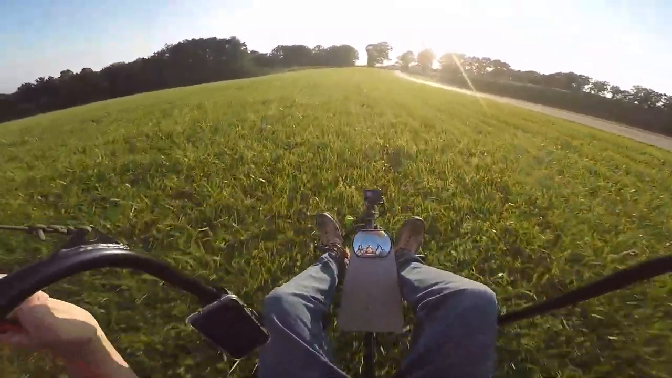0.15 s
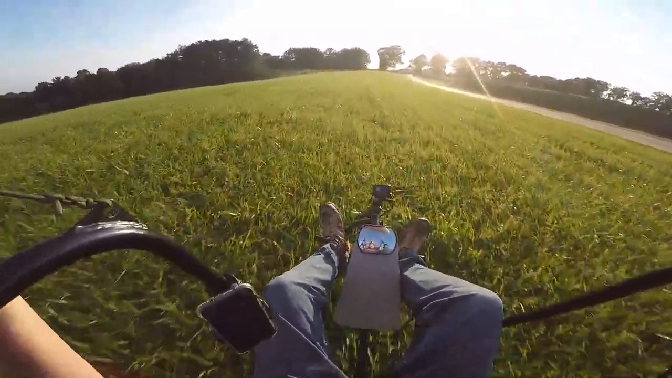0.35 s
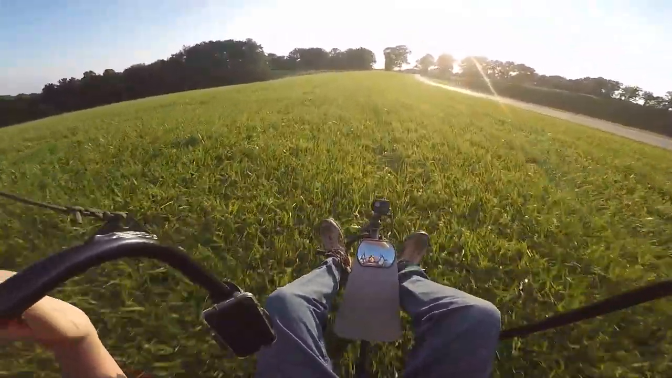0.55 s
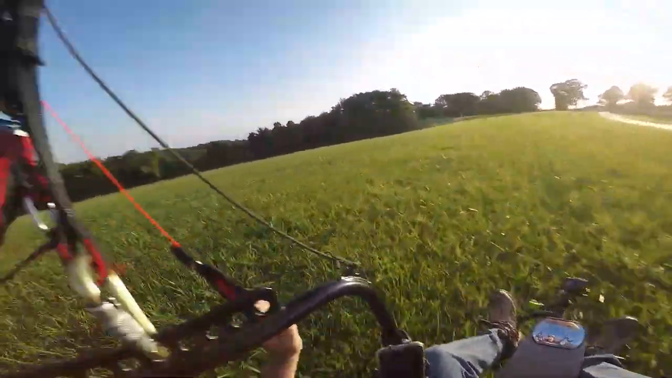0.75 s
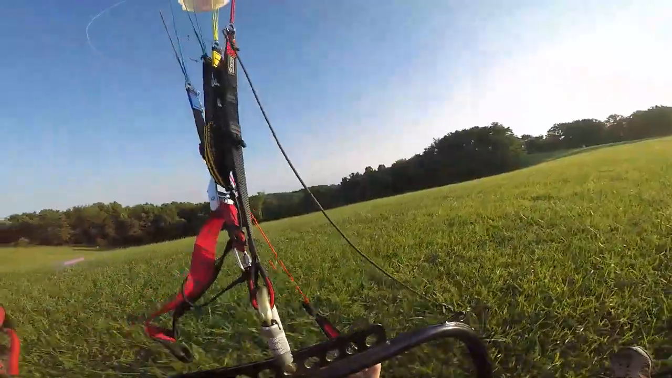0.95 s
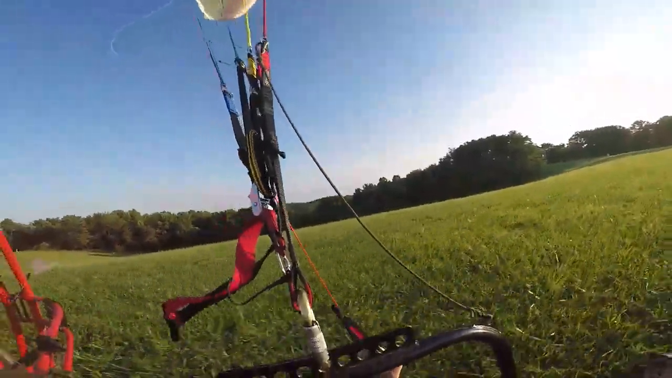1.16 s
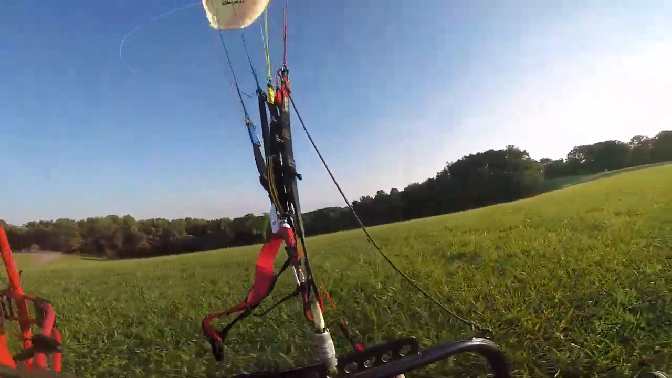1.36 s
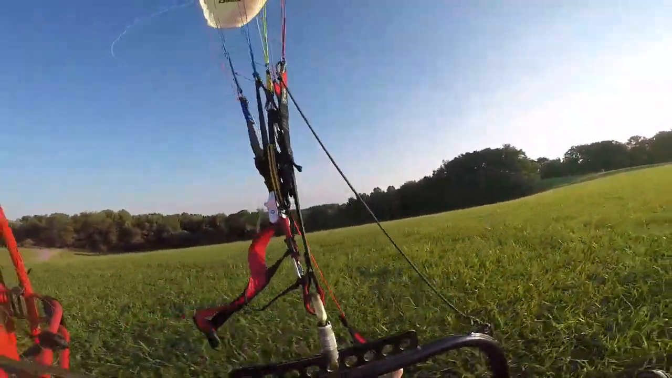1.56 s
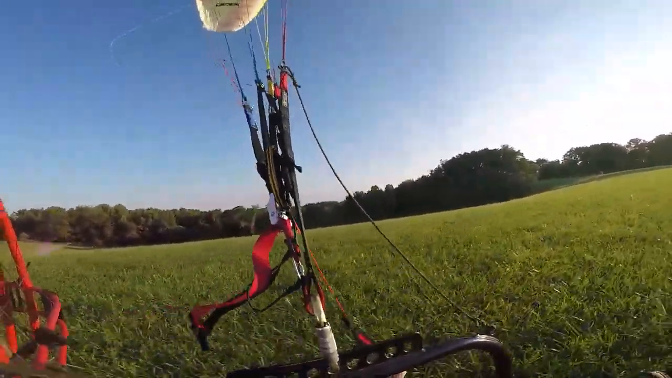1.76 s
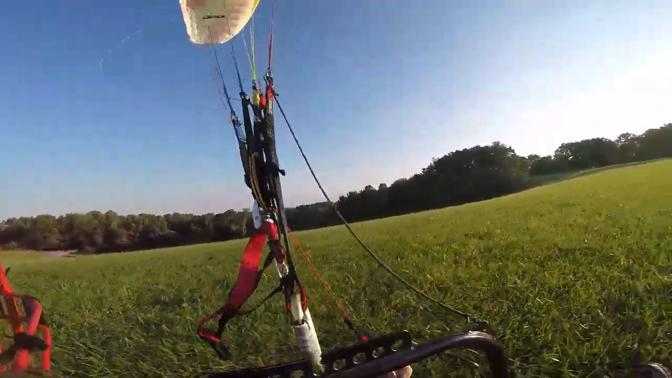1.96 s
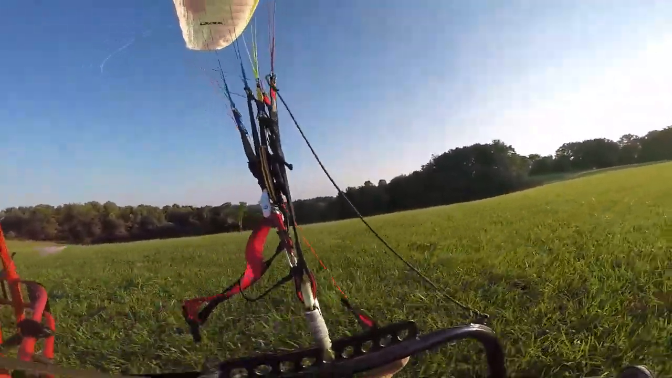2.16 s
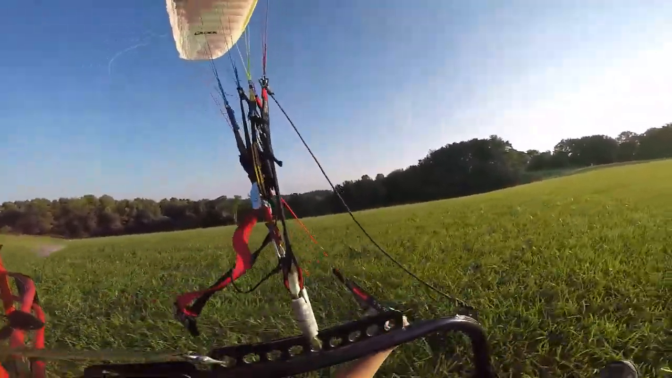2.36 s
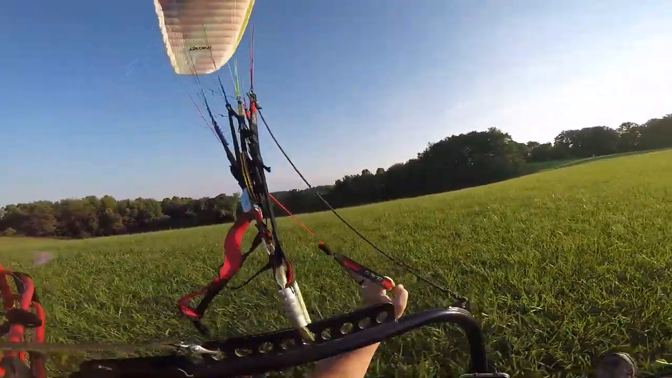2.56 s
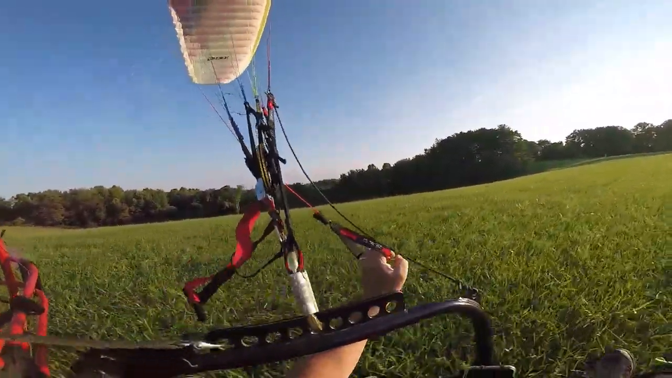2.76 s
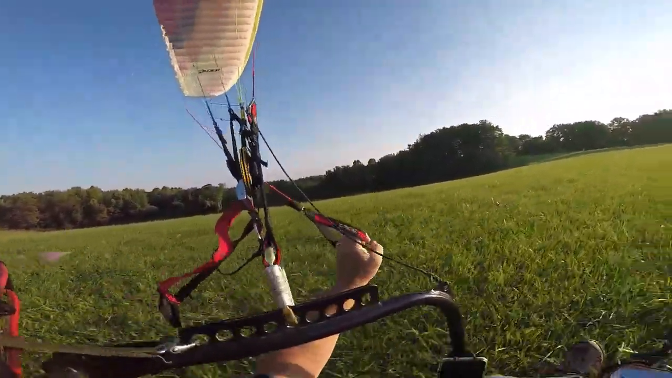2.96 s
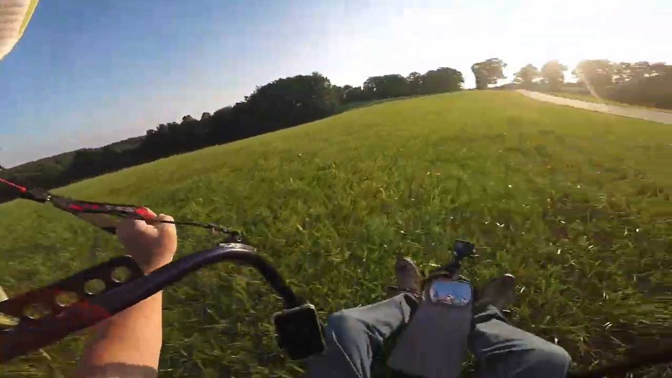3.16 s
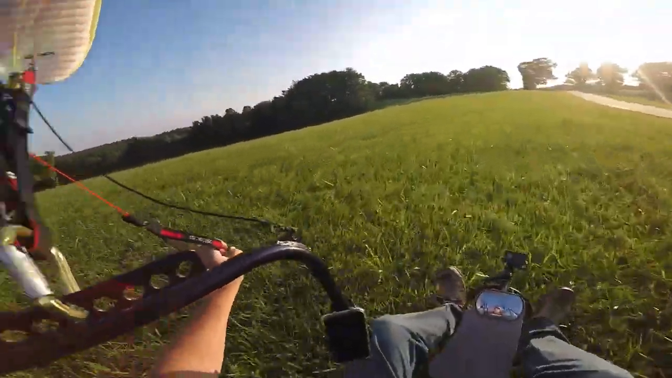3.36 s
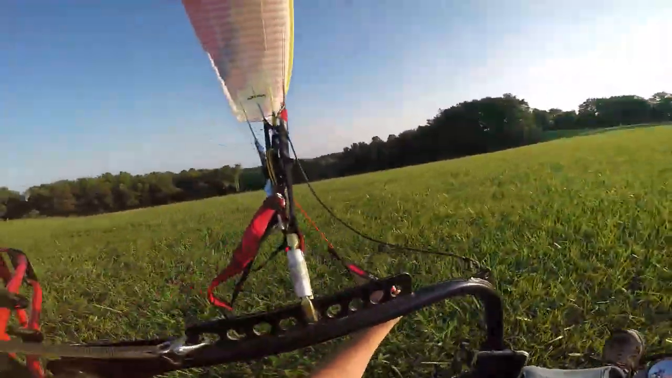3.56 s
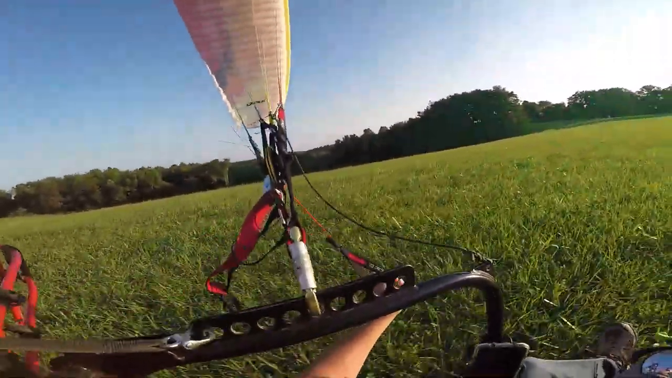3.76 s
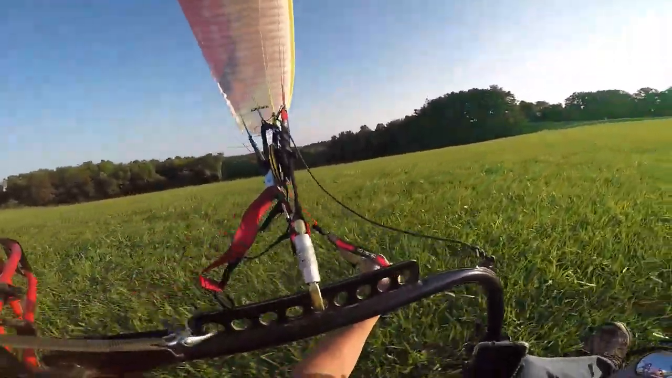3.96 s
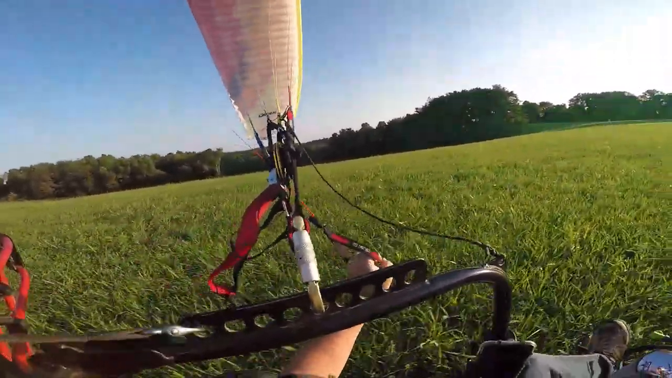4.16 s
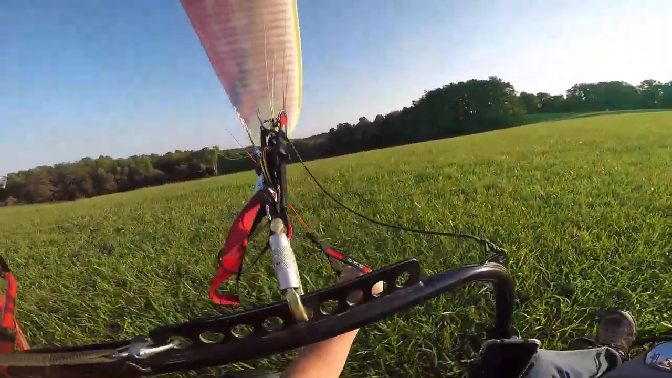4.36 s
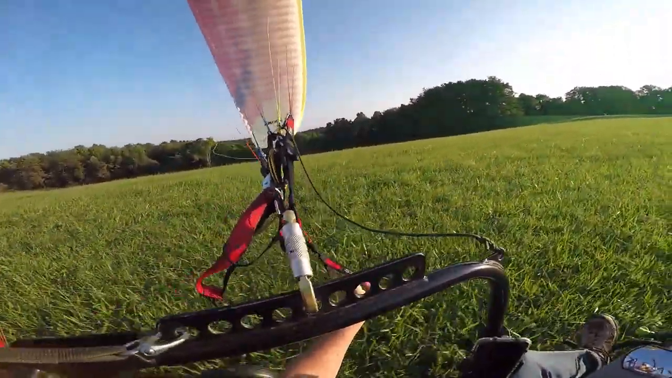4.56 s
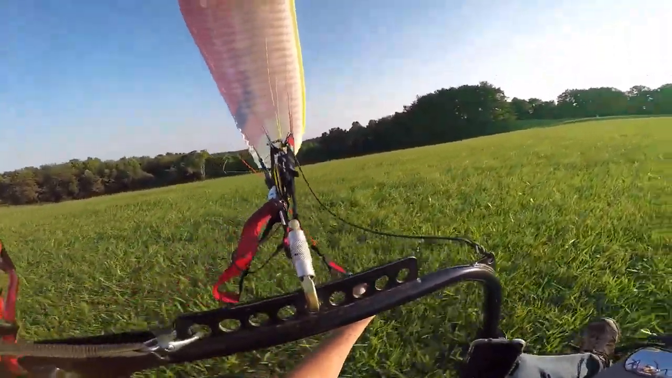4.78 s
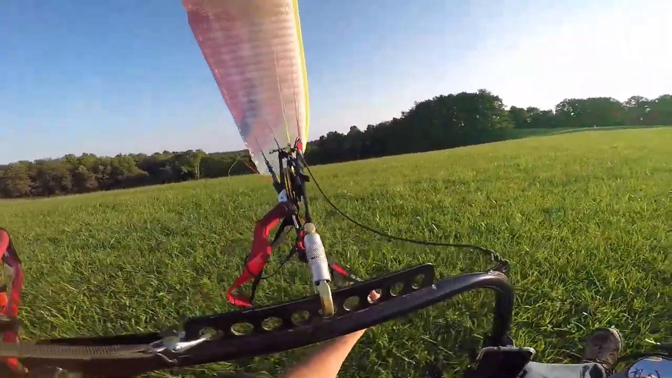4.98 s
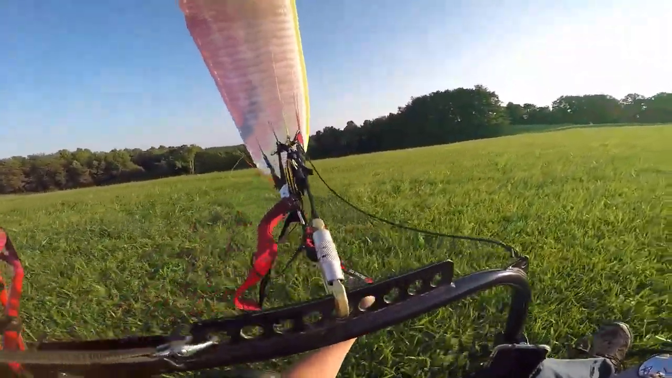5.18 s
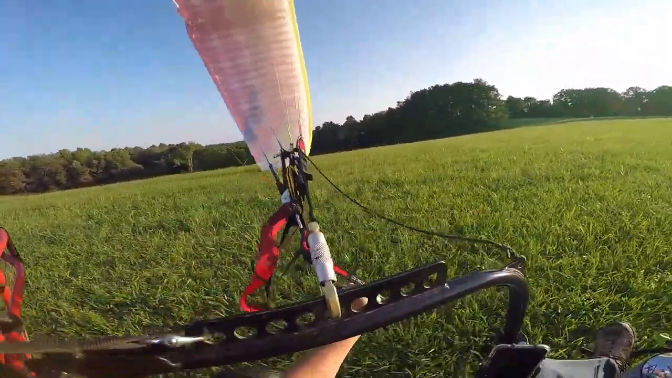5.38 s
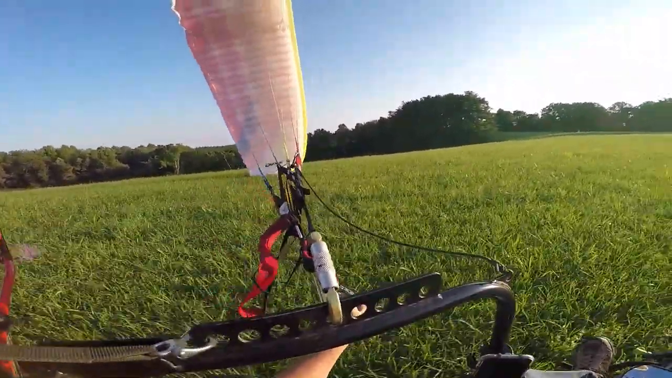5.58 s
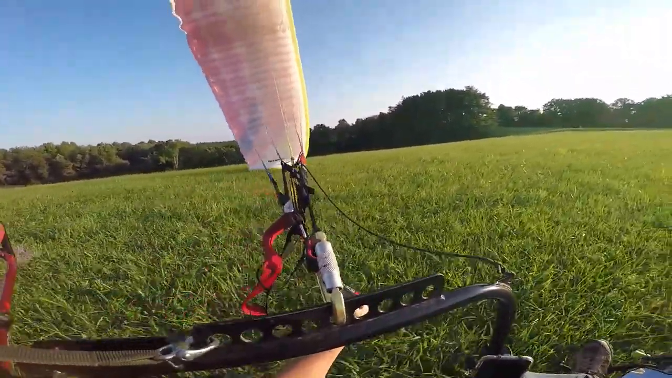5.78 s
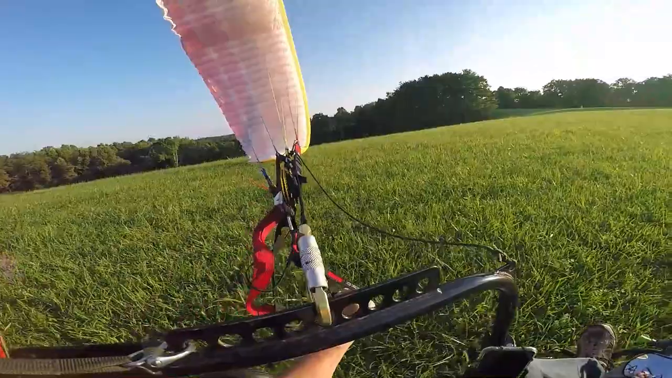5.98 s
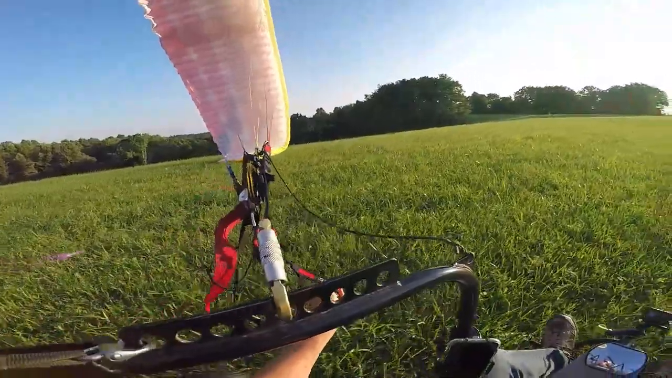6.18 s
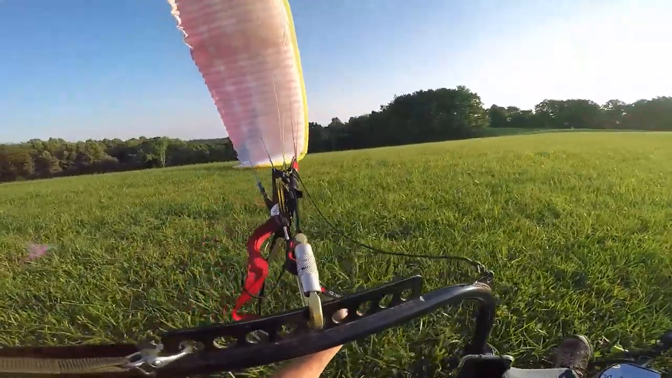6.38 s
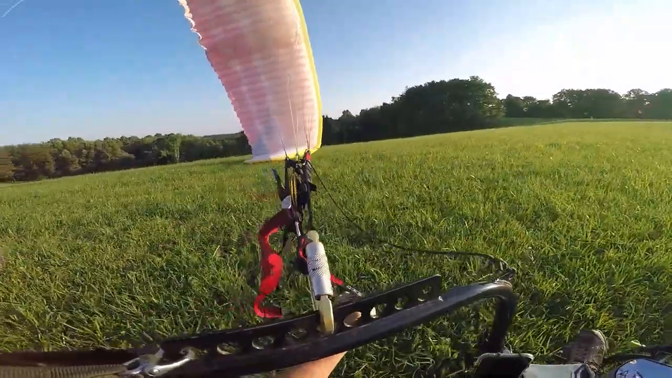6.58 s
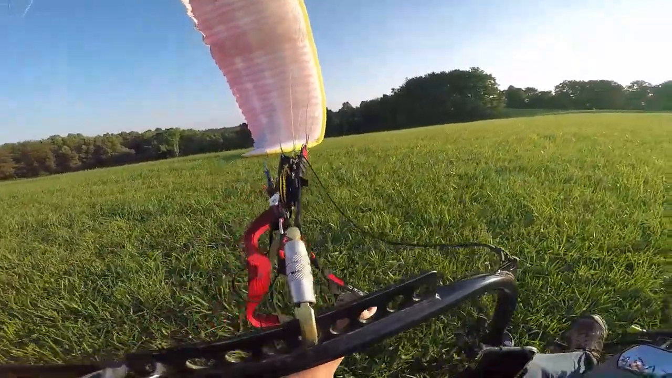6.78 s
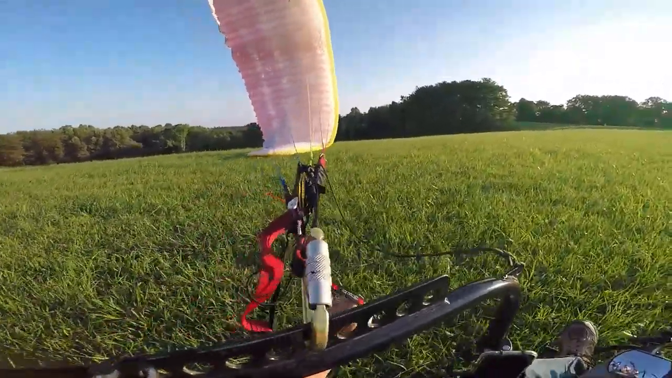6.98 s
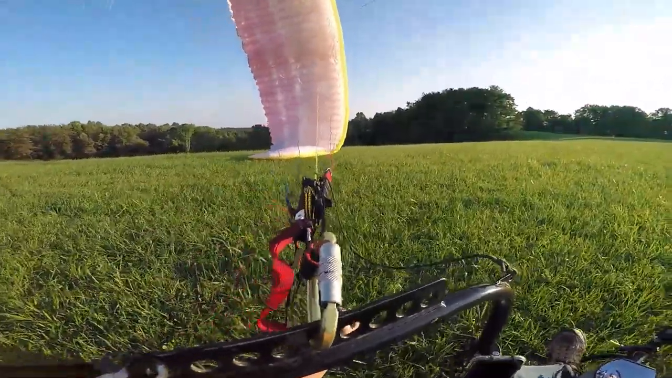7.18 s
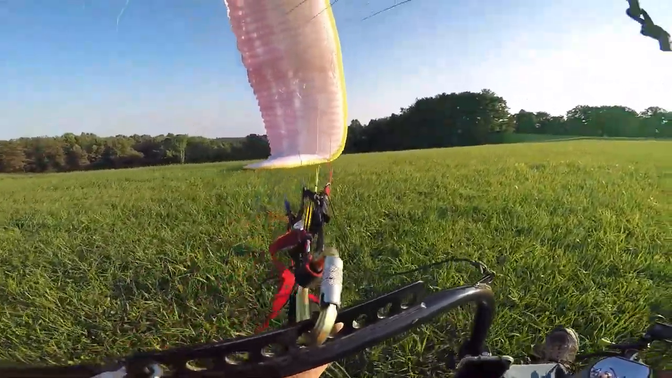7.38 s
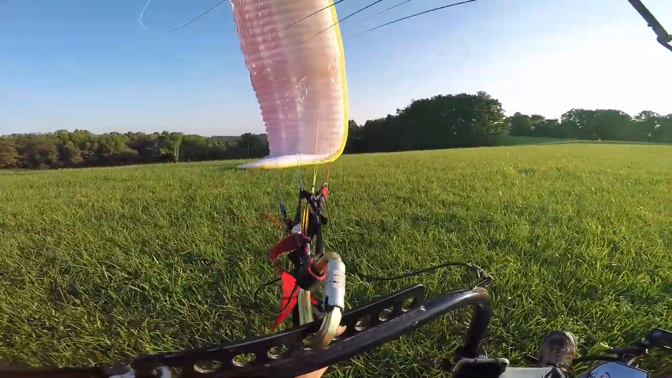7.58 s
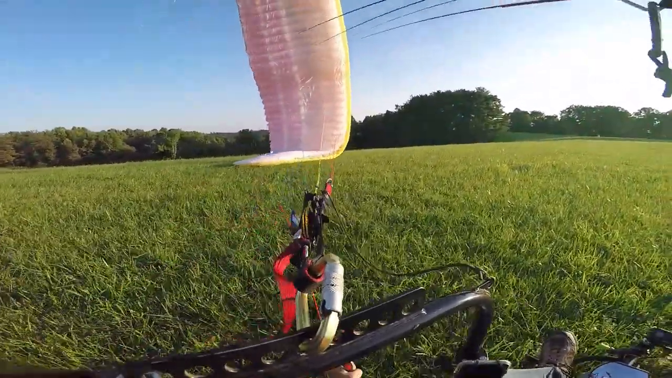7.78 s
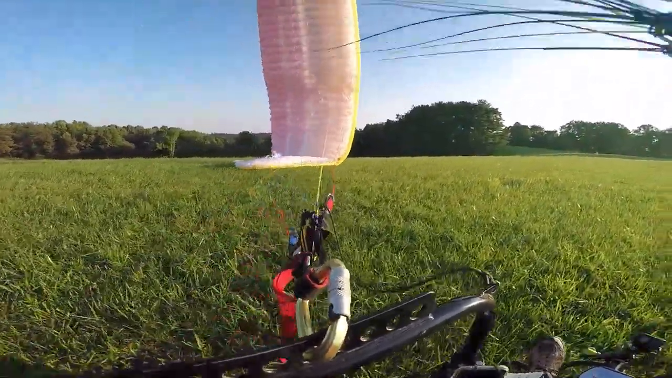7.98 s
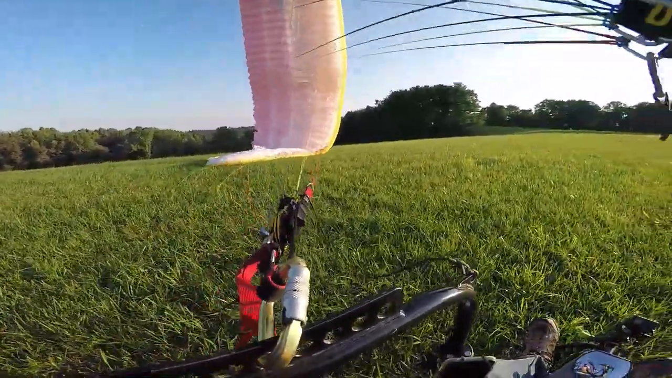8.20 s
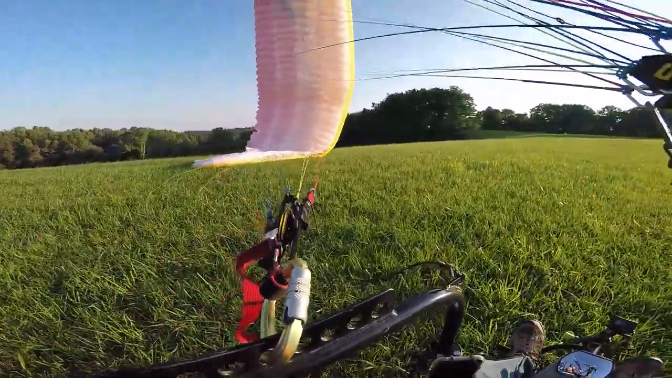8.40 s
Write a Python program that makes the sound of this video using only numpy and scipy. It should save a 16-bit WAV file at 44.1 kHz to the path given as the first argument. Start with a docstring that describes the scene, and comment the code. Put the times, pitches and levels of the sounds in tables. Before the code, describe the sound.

An engineless trike touches down and rolls out on turf. Close, boxy sound: hollow frame knocks, dry clacks of loose fittings, some bright tube jingle and short strap squeaks, loudest in the first second and a half. The rumble fades as it slows, leaving scattered clicks and small creaks over faint electronic hiss and thin whine. The microphone is dull and narrow, with brief soft-edged cuts.

```python
"""A short groan, a dense rattle and a low rumble come first: a light trike, its engine stopped, lands on grass.
The rattle thins to single knocks as it slows. Rumble is coloured noise; the frame, fittings and tubes are ringing
modes set off by many small contacts. Slipping straps and joints are short gliding tones, and grass stalks short rings.
A narrow-band microphone colours it all, with brief dropouts; the electronics hiss and whine faintly."""
import sys
import numpy as np
from scipy import signal
from scipy.fft import rfft, irfft
from scipy.io import wavfile
from scipy.ndimage import uniform_filter1d

SR = 44100
rng = np.random.default_rng(int(sys.argv[2]) if len(sys.argv) > 2 else 0)


def wrap_up_sound(samples):
    """Save the sound to the file named by the first command line argument, as 16-bit audio."""
    columns = np.atleast_2d(samples).T
    # keep every value between -1 and 1, then stretch to whole-number steps
    tamed = np.clip(columns, -1, 1)
    steps = np.round(tamed * 32767).astype(np.int16)
    wavfile.write(sys.argv[1], SR, steps)


N = 372204
TIME = np.arange(N) / SR
HZ = np.fft.rfftfreq(N, 1 / SR)


def amp(db):
    """Turns decibels into gain."""
    return 10 ** (np.asarray(db) / 20)


def unit(x):
    """Scales a sound to an average level (rms) of 1."""
    return x / np.sqrt(np.mean(x ** 2) + 1e-20)


def steady(x, span_s):
    """Holds the rms near 1 over a span, and keeps the faster flicker."""
    power = x ** 2
    for _ in range(2):
        power = uniform_filter1d(power, max(2, int(span_s * SR)))
    return x / np.sqrt(abs(power) + 1e-9 * np.mean(x ** 2))


def curve(rows):
    """Joins the points of a (time, value) table by straight lines, at every sample."""
    times, values = np.transpose(rows)
    return np.interp(TIME, times, values)


def spectrum(points):
    """Joins the points of a (frequency, value) table, at every frequency bin."""
    hz, value = np.transpose(points)
    return np.interp(np.log(HZ + 1), np.log(hz + 1), value)


def noise(gain):
    """Random noise of rms 1, coloured by a gain for every frequency bin."""
    return unit(irfft(rfft(rng.standard_normal(N)) * gain, N))


def fuzzy_tone(hz, width_hz):
    """Noise gathered around one frequency; around 0 Hz it becomes a slow random wander."""
    return noise(1 / (1 + ((HZ - hz) / width_hz) ** 2))


def add(mix, s, sound):
    """Mixes a sound in at a time in seconds."""
    part = mix[max(0, round(s * SR)):][:len(sound)]
    part += sound[:len(part)]


def low_pass(x, hz):
    """Removes the sound above a frequency, steeply."""
    taps = signal.firwin(701, hz, window=("kaiser", 8), fs=SR)
    return signal.oaconvolve(x, taps, "same")


def slip_tone(hz, length_s, glide, waver):
    """One slip: a tone of rms 1 that swells quickly, slides in pitch and fades."""
    progress = np.linspace(0, 1, int(length_s * SR))
    pitch = hz * glide ** progress * (1 + waver[:len(progress)])
    turns = np.cumsum(pitch) / SR
    return unit(np.sqrt(progress) * (1 - progress) * np.sin(2 * np.pi * turns))


# Short squeaks and groans of the rigging and seat, before the microphone:
# (time [s], starting pitch before its waver [Hz], rms level [dB], length [s], end pitch over start pitch [ratio])
SLIPS = [(0.0, 352, -39.5, 0.067, 1.42), (0.329, 607, -31, 0.035, 1.01), (0.706, 591, -30, 0.044, 0.92),
         (1.507, 2590, -33.5, 0.012, 1.13), (1.92, 223, -37.5, 0.038, 0.72), (2.055, 2183, -47, 0.05, 1.17),
         (2.344, 321, -48, 0.062, 0.9), (2.415, 313, -41.5, 0.062, 0.38), (2.727, 192, -49, 0.047, 1.27),
         (3.265, 2170, -48, 0.037, 1.03), (3.496, 940, -44, 0.033, 0.86), (3.588, 2100, -48.5, .019, 1),
         (3.664, 2440, -50, 0.039, 0.95), (4.219, 571, -43, 0.052, 0.93), (4.492, 590, -50.5, .022, 0.95),
         (4.65, 2385, -47.5, 0.034, 0.99), (5.012, 550, -41.5, 0.017, 1.01), (5.607, 605, -49, 0.037, 0.93),
         (7.218, 1064, -51.5, .023, 1.0), (7.838, 963, -52.5, 0.022, 1.1), (7.9, 190, -58, 0.047, 1),
         (8.1, 205, -56, 0.032, 1.02), (8.263, 574, -42, 0.035, 0.98), (8.264, 837, -44, 0.032, 1.15)]


def squeaks():
    """A strap or shackle slips with a short, unsteady tone."""
    out = np.zeros(N)
    waver = .055 * fuzzy_tone(0, 450)
    for s, hz, level_db, length_s, glide in SLIPS:
        tone = slip_tone(hz, length_s, glide, waver[int(s * SR):])
        add(out, s, amp(level_db) * tone)
    return out


def swells(rows, rise_s=0.013, settle_s=.035):
    """Gain of a row of swells: each rises quickly, holds for its length and settles."""
    power = np.zeros(N)
    for start, length, level_db in rows:
        rise = np.clip((TIME - start) / rise_s, 0, 1)
        settle = np.exp(-np.maximum(TIME - start - length, 0) / settle_s)
        power += (amp(level_db) * rise * settle) ** 2
    return np.sqrt(power)


# Shaking by the level turf, on the scale of the ground's strength: (time [s], level [dB])
LEVEL_TURF = [(0, -35), (.27, -51.5), (.6, -42), (1.35, -45), (1.8, -47), (2.3, -53), (3.2, -60),
              (5.2, -60.5), (6.4, -66), (8.44, -67.5)]
# Humps and rough patches under the wheels, on the same scale: (start time [s], length [s], level [dB])
ROUGH_PATCHES = [(0, 0.083, -35), (.31, 0.044, -30.5), (.455, 0.31, -33), (.77, 0.044, -36),
                 (.91, 0.22, -37), (1.02, 0.14, -33.5), (1.18, .14, -32.5), (1.38, 0.3, -38),
                 (1.9, 0.12, -45.5), (2.11, 0.1, -47.5), (2.38, 0.22, -43.5), (2.68, .09, -50.5),
                 (2.83, .04, -54), (3.0, 0.1, -44), (3.27, 0.067, -55), (3.46, 0.12, -47),
                 (3.83, 0.085, -47.5), (4.02, 0.13, -47), (4.15, 0.27, -53.5), (4.74, 0.052, -59.5),
                 (5.57, 0.043, -52), (6.85, 0.15, -61), (7.35, 0.065, -64.5), (7.75, 0.11, -58.5),
                 (7.88, 0.054, -62.5), (8.1, 0.073, -64)]


def ground():
    """How hard the ground shakes the trike, in dB: steady rolling, humps and chance lumps."""
    rolling_and_humps = np.hypot(amp(curve(LEVEL_TURF)), swells(ROUGH_PATCHES))
    chance_lumps_db = 2 * fuzzy_tone(0, 16)  # rms 2 dB, mostly below 16 Hz
    return 20 * np.log10(rolling_and_humps) + chance_lumps_db


# Share of the trike's weight that the wing still carries: (time [s], share [0-1])
WING_SHARE = [(0, 1), (1.2, 0.74), (2.0, 0)]


def driven(ground_db, level_db, slope, lifted_db):
    """Gain of one part: it follows the ground, less so while the wing takes weight, and wanders by itself."""
    reference_db = -45  # ground strength at which the part has its plain level
    follow_db = slope * (ground_db - reference_db)  # slope: dB per dB of ground
    seating_db = 0.95 * fuzzy_tone(0, 10.6)  # the part sits now tighter, now looser
    return amp(level_db + follow_db + lifted_db * curve(WING_SHARE) + seating_db)


def contacts(modes, scatter, uneven_db, damping=1, count=20):
    """Rings of one part struck at several places: each place stresses and shifts the modes in its own way."""
    hz, db, t60 = np.transpose(modes)[:, :, None]
    t = np.arange(int(SR * t60.max())) / SR
    rings = []
    for _ in range(count):
        shift, stress, sign = rng.standard_normal((3, len(modes), 1))
        fading_db = db + uneven_db * stress - 60 * damping * t / t60
        height = np.sign(sign) * amp(fading_db) / np.sqrt(t60)
        shifted_hz = hz + scatter * shift / t60  # quickly fading modes stray most
        rings.append(unit((height * np.sin(2 * np.pi * shifted_hz * t)).sum(0)))
    return rings


def rattle(rings, fast_per_s, slow_per_s, size_db, span_s):
    """Countless small contacts of uneven size, rarer as the trike slows."""
    rate = np.geomspace(fast_per_s, slow_per_s, N)
    hits = np.flatnonzero(rng.random(N) < rate / SR)
    sizes = amp(size_db * np.minimum(rng.exponential(1, N), 4))
    places = rng.integers(0, len(rings), N)
    out = np.zeros(N)
    for i in hits:
        add(out, i / SR, sizes[i] * rings[places[i]])
    return steady(out, span_s)


def creaks(low_hz, high_hz, slide, length_s, count):
    """Small slips at random moments and pitches, as straps and joints work against each other."""
    out = np.zeros(N)
    waver = 0.065 * fuzzy_tone(0, 204)
    for k, (when, pitch, glide, length, size) in enumerate(rng.random((count, 5))):
        hz = low_hz * (high_hz / low_hz) ** pitch
        end_over_start = np.exp(slide * (2 * glide - 1))
        tone = slip_tone(hz, length_s * (.5 + length), end_over_start, waver[int(when * N / 2):])
        add(out, (k + when) / count * N / SR, amp(10 * size) * tone)
    return unit(out)


def jolt_share(bright_db, order):
    """Share of a knock that goes to part 0 (frame), 1 (fittings) or 2 (tubes): bright ones favour the tubes."""
    gains = amp([-bright_db / 2, 0, bright_db / 2])  # the fittings lie midway
    return gains[order] / np.linalg.norm(gains)


# Knocks that throw loose parts about; each part then takes its share, and the chatter is spread by a factor below:
# (time [s], relative level [dB], brightness as tubes over frame [dB], chatter length before spreading [s])
KNOCKS = [(.052, -24, -13.5, .011), (.318, -31, -4, 0.01), (.329, -28, -11, 0.0087),
          (.453, -35.5, -12, 0.0095), (.47, -33.5, -11, .012), (0.713, -24.5, -2, .012),
          (1.036, -22.5, 0.5, .011), (1.056, -22, 15, 0.0058), (1.102, -23, 5, 0.0073),
          (1.199, -28, -31, .01), (1.314, -29.5, -7, .01), (1.38, -31.5, -5, 0.014),
          (1.519, -32.5, 11, 0.0098), (1.586, -28, -28, 0.025), (1.695, -33.5, -1, 0.013),
          (1.876, -34, 9.5, .012), (2.123, -44, -8, .035), (2.213, -41, -2, 0.018), (2.347, -38, 4, 0.018),
          (2.415, -36, -12, 0.0096), (2.472, -35.5, 7, .006), (2.53, -32.5, 10, 0.0097),
          (2.59, -31, 19, 0.018), (2.688, -36.5, -10, .016), (2.73, -37, 27, 0.027),
          (2.838, -40.5, -11, 0.028), (2.959, -40, 38, 0.0059), (2.987, -34, 35, 0.023),
          (3.051, -36, -1, 0.015), (3.272, -42.5, -32, 0.012), (3.868, -42, 8, .022),
          (3.902, -39, 10, 0.01), (4.021, -33.5, -10, .017), (4.037, -40.5, -7, 0.021),
          (4.108, -34, 26, 0.013), (4.172, -42, 0, 0.0048), (4.224, -35, -14, 0.017),
          (4.255, -39, 9, 0.032), (4.324, -39.5, 23, 0.019), (4.357, -38.5, 4, 0.0078),
          (4.395, -42.5, 17, 0.027), (4.766, -44, -3, .007), (4.802, -44.5, 28, .005),
          (5.112, -49, 7, 0.022), (5.273, -35.5, 11, 0.0097), (5.472, -46, 6, .005),
          (5.569, -39.5, 16, 0.009), (5.615, -44.5, -20, .011), (5.691, -43.5, 33, .003),
          (5.833, -49, 28, 0.013), (5.94, -48, -2, 0.019), (6.228, -48.5, -6, 0.017),
          (6.465, -47, -6, .018), (6.764, -43, -14, .03), (6.86, -44.5, 6, 0.015), (6.875, -39, -1.5, .014),
          (6.961, -44.5, -11, 0.023), (7.258, -44.5, -2, 0.0082), (7.357, -48.5, 22, 0.024),
          (7.396, -54, 5, .03), (7.531, -40, 12, 0.0091), (7.746, -37, -8, 0.025), (7.79, -43, -2, .01),
          (8.101, -53.5, -9, .015), (8.266, -46, 1, 0.017), (8.295, -47, -11, 0.0032)]


def jolts(rings, order, rebound_db, count=6):
    """Each knock is a few quick contacts: short ones snap at once, long ones start softly and swell."""
    out = np.zeros(N)
    for s, level_db, bright_db, length_s in KNOCKS:
        slip, size, choice = rng.random((3, count))
        when = (np.arange(count) + slip - .5) / count
        size_db = rebound_db - 5 * when - 5 * size
        when[0] = 0
        size_db[0] = np.interp(length_s, [.008, .015], [2, -6])  # first contact
        places = rng.integers(0, len(rings), 2)  # the part chatters between two stops
        chatter = np.zeros(SR // 5)
        for w, c, db in zip(when, choice, size_db):
            add(chatter, w * length_s * 1.25, amp(db) * rings[places[round(c)]])
        loudness = np.sqrt(np.sum(chatter ** 2) / (SR / 50))  # taken over a fiftieth of a second
        add(out, s, amp(level_db) * jolt_share(bright_db, order) * chatter / loudness)
    return out


# Ringing modes of the frame, before the scatter from contact to contact:
# (frequency [Hz], relative level [dB], time to fade by 60 dB [s])
FRAME_MODES = [(262.4, -2.5, 0.074), (339, -7, 0.039), (472.7, 1.5, 0.04), (568.5, 2.5, 0.089),
               (680, -1.5, 0.012), (797, -3, 0.0097)]
# Drone of the frame while the wheels only skim the grass: (start time [s], length [s], level [dB])
SKIMMING_DRONES = [(.09, 0.049, -38), (.15, 0.73, -47), (.48, 0.286, -38.5), (.775, 0.05, -34)]


def frame(ground_db):
    """Hollow knocks and low creaks of the frame, and its drone while the wheels skim the grass."""
    rings = contacts(FRAME_MODES, scatter=0.72, uneven_db=5.0)
    drone = swells(SKIMMING_DRONES) * steady(fuzzy_tone(582, 34), 0.07)
    knocks = rattle(rings, fast_per_s=1000, slow_per_s=150, size_db=4.15, span_s=0.06)
    groans = creaks(230, 800, slide=.35, length_s=.022, count=330)
    lift = curve(WING_SHARE)
    creak_share = np.interp(lift, [0, 1], [0.65, 0.21])  # more creaks once the wheels carry the weight
    shaking = np.sqrt(1 - creak_share) * knocks + np.sqrt(creak_share) * groans
    shaking = shaking - 0.58 * lift * low_pass(shaking, 360)  # weaker lows while the wing carries
    rolling = driven(ground_db, level_db=-47, slope=1.0, lifted_db=-.5) * shaking
    return rolling + drone + amp(-3.5) * jolts(rings, order=0, rebound_db=-1.0)


# Ringing modes of buckles, shackles and brackets, before the scatter from contact to contact:
# (frequency [Hz], relative level [dB], time to fade by 60 dB [s])
FITTING_MODES = [(943, -4.5, 0.026), (1077, -6.5, 0.077), (1178, -5, 0.012), (1323, -4, 0.018),
                 (1453, -4.5, 0.027), (1687, 0, 0.012), (1915, -3, 0.057), (2063, 0, 0.037),
                 (2343, -4, 0.021), (2666, 6, 0.014)]


def fittings(ground_db):
    """Dry clacks and crackle of the loose hardware, with tiny slips among them."""
    rings = contacts(FITTING_MODES, scatter=1.0, uneven_db=7.0)
    slips = creaks(900, 2700, slide=.1, length_s=.009, count=700)
    clacks = rattle(rings, fast_per_s=1200, slow_per_s=130, size_db=4.8, span_s=.055)
    shaking = .9 * clacks + .4 * slips
    rolling = driven(ground_db, level_db=-48.5, slope=1, lifted_db=-1.3) * shaking
    return rolling + amp(-1.5) * jolts(rings, order=1, rebound_db=-1.0)


# Ringing modes of the tubes, before the scatter and any extra damping:
# (frequency [Hz], relative level [dB], time to fade by 60 dB [s])
TUBE_MODES = [(2888, -10, 0.083), (2900, -10.5, 0.0037), (3181, -8.5, 0.07), (3380, -5.5, 0.0065),
              (3455, -4, 0.24), (3490, -6, 0.17)]


def tubes(ground_db):
    """Bright jingle of metal on the tubes; a firm knock stays in contact and chokes the ring."""
    free = contacts(TUBE_MODES, scatter=0.59, uneven_db=2.5)
    choked = contacts(TUBE_MODES, scatter=.4, uneven_db=3, damping=1.35)
    shaking = rattle(free, fast_per_s=500, slow_per_s=80, size_db=4, span_s=.05)
    rolling = driven(ground_db, level_db=-42.5, slope=1.12, lifted_db=-15) * shaking
    return rolling + amp(-0.64) * jolts(choked, order=2, rebound_db=-1.5)


# Colour of the tyre rumble: (frequency [Hz], relative level [dB per Hz])
TYRE_COLOUR = [(10, -51.5), (30, -2), (70, -10.5), (130, -2.5), (190, 3), (240, -3.5), (320, 0.5),
               (600, -41)]


def tyres(ground_db):
    """Low rumble of soft tyres on lumpy ground, with a thump under each knock, strongest for dull ones."""
    t = np.arange(SR // 5) / SR
    rise_s, decay_s, thump_db, lifted_db = 0.0057, 0.011, -8, -11
    thump = np.minimum(t / rise_s, 1) * np.exp(-np.maximum(t - rise_s, 0) / decay_s)
    thumps = np.zeros(N)
    for s, level_db, bright_db, _ in KNOCKS:
        add(thumps, s, amp(level_db + thump_db) * jolt_share(bright_db, order=0) * thump)
    on_ground = amp(lifted_db * curve(WING_SHARE))  # weaker while the wing carries the weight
    rolling = driven(ground_db, level_db=-49, slope=1.0, lifted_db=lifted_db)
    rumble = steady(noise(amp(spectrum(TYRE_COLOUR))), 0.048)
    return np.hypot(rolling, on_ground * thumps) * rumble


def flicks(ground_db, low_hz=350, high_hz=3300, ring_s=.004, count=150):
    """Single stalks flick against the trike, each with a short ring at a pitch of its own."""
    t = np.arange(SR // 20) / SR
    out = np.zeros(N)
    for when, pitch, size in rng.random((count, 3)):
        hz = low_hz * (high_hz / low_hz) ** pitch
        ring = np.exp(-t / ring_s) * np.sin(2 * np.pi * hz * t)
        size_db = -6.5 + 13 * size ** 2  # against the shaking of the ground
        add(out, when * N / SR, amp(size_db) * ring)
    return amp(ground_db) * out


# Colour of the background hiss: (frequency [Hz], relative level [dB per Hz])
HISS_COLOUR = [(20, 16.5), (100, 17), (300, 9.5), (900, 11), (1500, 1), (2300, 6), (3400, 2), (4000, -1.5),
               (8000, -0.5), (11000, -4), (15000, -3.5)]
# Likeness of the hiss in the two channels: (frequency [Hz], shared part of the power [0-1])
HISS_LIKENESS = [(20, 0.2), (1500, 0.51), (3500, 0), (5000, 0.34), (15000, 0.47)]
# Faint electronic whines: (frequency [Hz], width [Hz], rms level [dB], depth of the pulsing [0-1])
WHINE_LINES = [(1606, 9.2, -76, 0.3), (8562, 38, -73, 1)]
PULSING_HZ = 59.94


def electronics():
    """Soft hiss in both channels, partly shared, and thin whines that pulse."""
    colour, same = amp(spectrum(HISS_COLOUR)), spectrum(HISS_LIKENESS)
    shared, *own = rfft(rng.standard_normal((3, N)))
    mixed = np.sqrt(same) * shared + np.sqrt(1 - same) * np.array(own)
    hiss = unit(irfft(colour * mixed, N))
    pulses = .5 + .5 * np.tanh(4 * np.sin(2 * np.pi * (PULSING_HZ * TIME + 0.44)))
    whines = np.zeros(N)
    for hz, width_hz, level_db, depth in WHINE_LINES:
        tone = steady(fuzzy_tone(hz, width_hz), 0.0085)
        whines += amp(level_db) * unit(tone * (1 - depth + depth * pulses))
    return amp(-63.0) * hiss + whines


def top_buzz(count=9):
    """A very high, faint buzz: lines one pulse rate apart, weaker downwards, swelling with each pulse."""
    k = np.arange(count)[:, None]
    hz = 15255 - PULSING_HZ * k
    turns = hz * TIME + .8 * k + .5 * rng.random((count, 1))
    lines = amp(-.8 * k) * np.sin(2 * np.pi * turns)
    return amp(-77.5) * unit(lines.sum(0))


# Instants where the sound cuts out with a soft bump, before the microphone's colour: (time [s], bump peak [dB])
CUTS = [(0.517, -23), (1.0236, -25), (1.5227, -31.5), (2.017, -29.5), (2.535, -26), (3.0249, -35.5),
        (3.517, -39), (4.025, -38.5), (5.017, -39)]


def dropouts(x, gap_s=0.00352, settle_s=0.0069):
    """The sound is cut for a few milliseconds while the signal swings up, then dips below zero and settles."""
    t = np.arange(SR // 25) / SR
    gap = 1. * (t < gap_s)
    after = np.maximum(t - gap_s, 0) / settle_s
    swing_up = gap * np.sqrt(abs(np.sin(np.pi * t / gap_s)))
    swing = swing_up - 3 * after * np.exp(-2 * after)
    cut, bumps = np.zeros((2, N))
    for s, peak_db in CUTS:
        add(cut, s, gap)
        add(bumps, s, amp(peak_db) * swing)
    return x * (1 - cut) + bumps


def scene():
    """All the sounds of the trike at one microphone; the same ground shakes every part."""
    ground_db = ground()
    parts = frame(ground_db) + fittings(ground_db) + tubes(ground_db)
    wheels_and_grass = tyres(ground_db) + flicks(ground_db)
    return (squeaks() + parts + wheels_and_grass)[None]


# Colour of the microphone: (frequency [Hz], gain [dB])
MICROPHONE_COLOUR = [(40, -10), (150, -2), (280, -1), (420, -2), (600, 0.5), (850, 0), (1300, 2.5),
                     (1900, -1), (2500, -3.5), (3100, -0.5), (3600, -0.5)]


def record(dry):
    """A narrow-band microphone feeds both channels, the left a little late; then electronics and band limit."""
    band_hz, edge_hz, left_lag_s = 3650, 15330, 0.00012
    narrow = rfft(low_pass(dropouts(dry[0]), band_hz)) * amp(spectrum(MICROPHONE_COLOUR))
    left = narrow * np.exp(-2j * np.pi * HZ * left_lag_s)
    pair = irfft(np.array([left, narrow]), N)
    noisy = pair + electronics() + top_buzz()
    return np.array([low_pass(channel, edge_hz) for channel in noisy])


dry = scene()
out = record(dry)
wrap_up_sound(out)
```